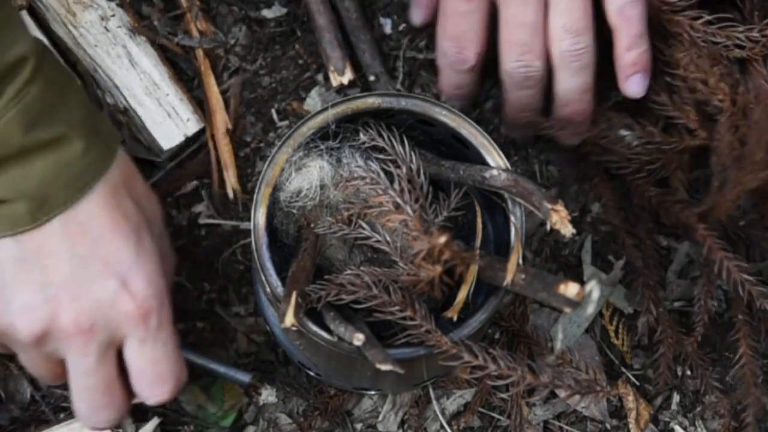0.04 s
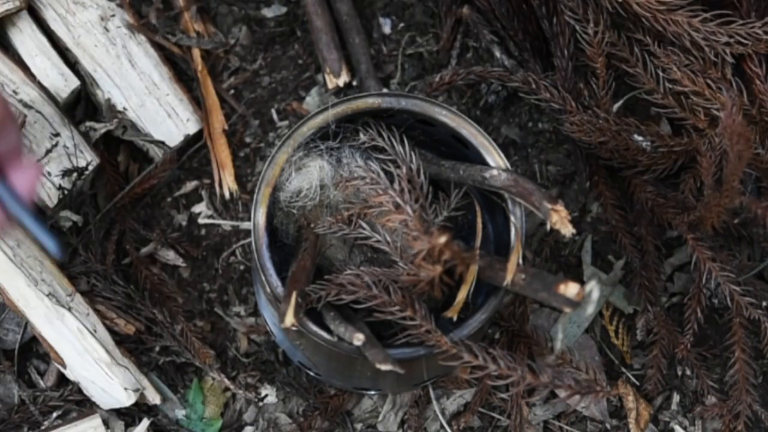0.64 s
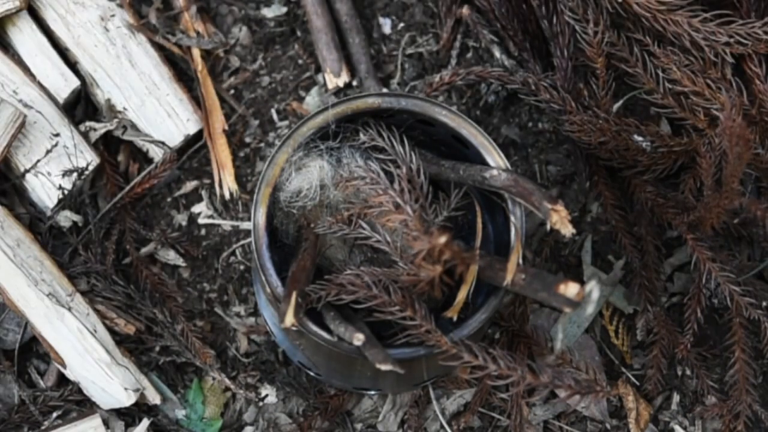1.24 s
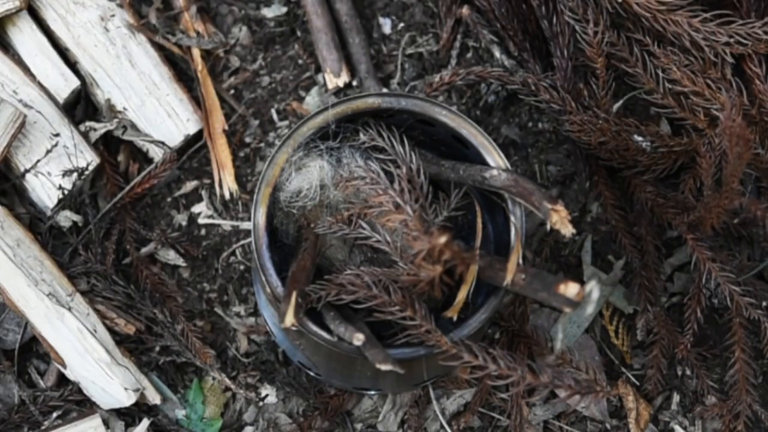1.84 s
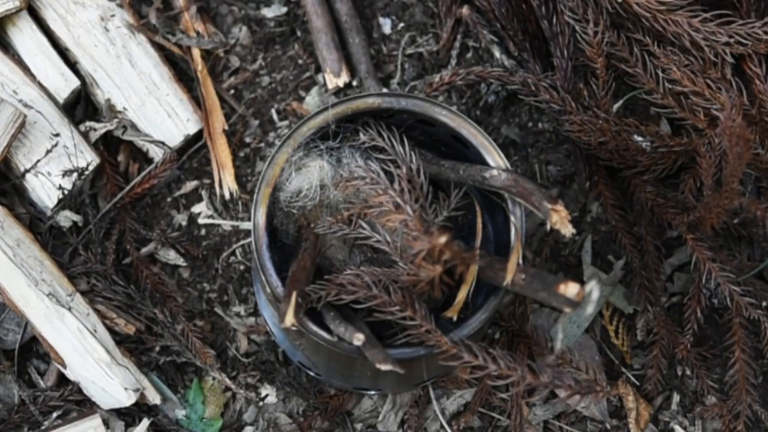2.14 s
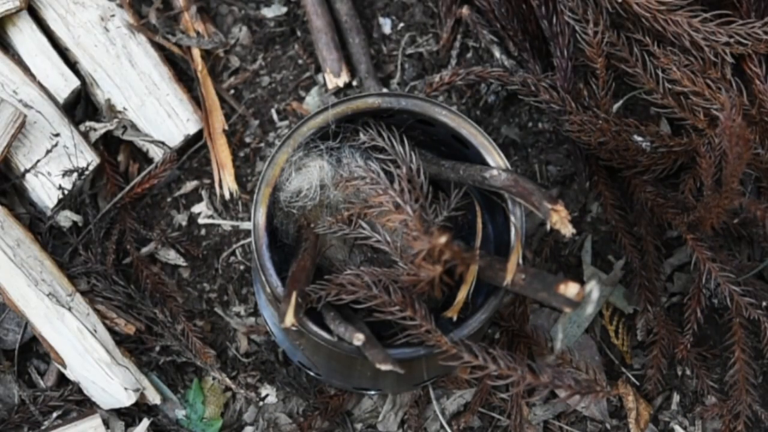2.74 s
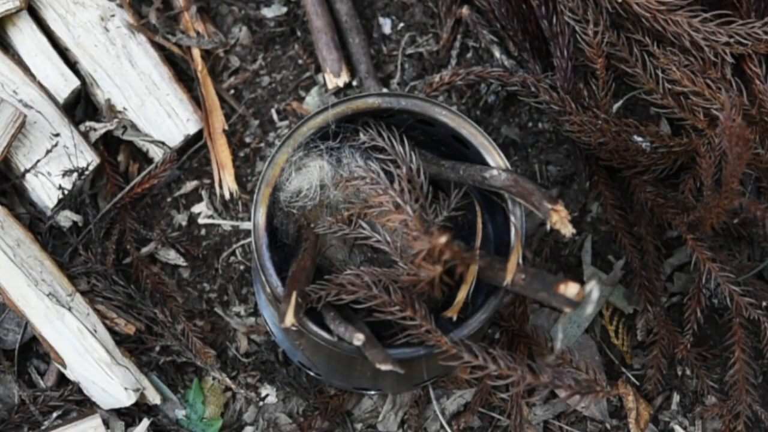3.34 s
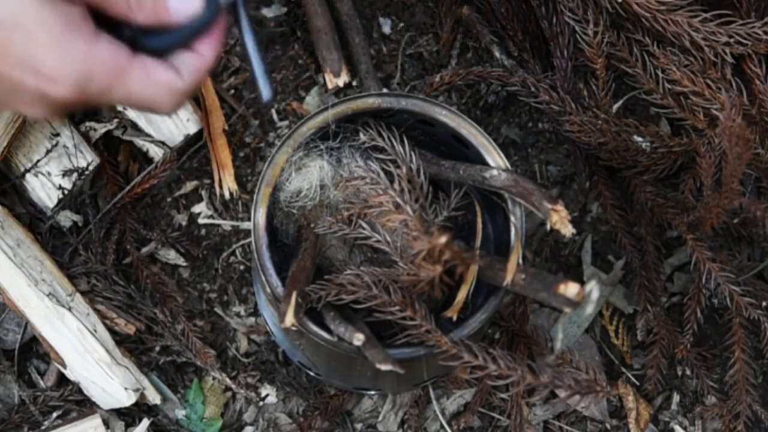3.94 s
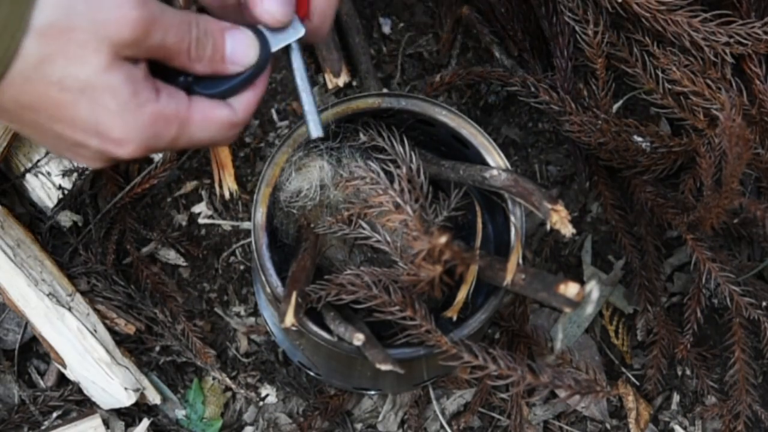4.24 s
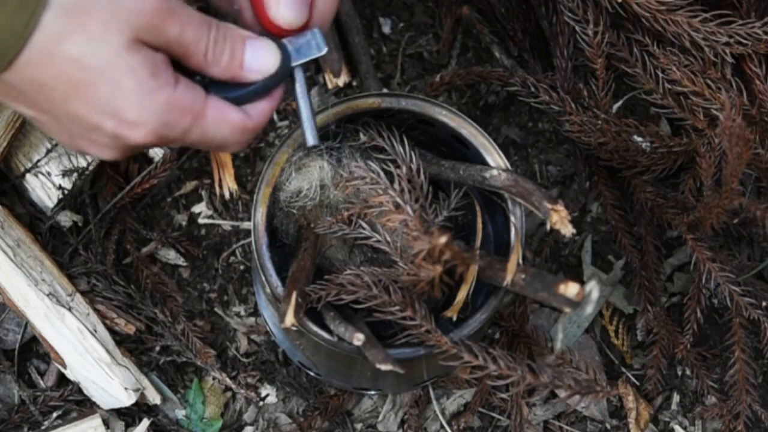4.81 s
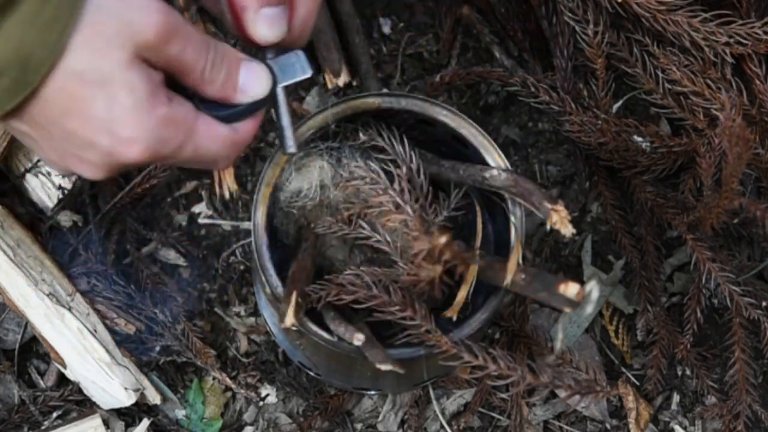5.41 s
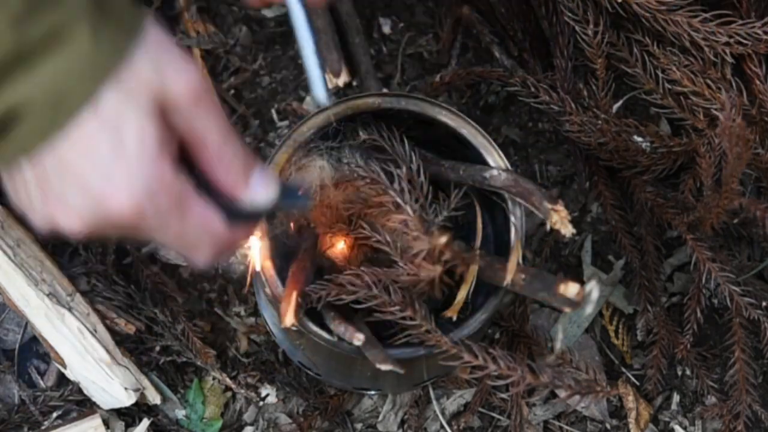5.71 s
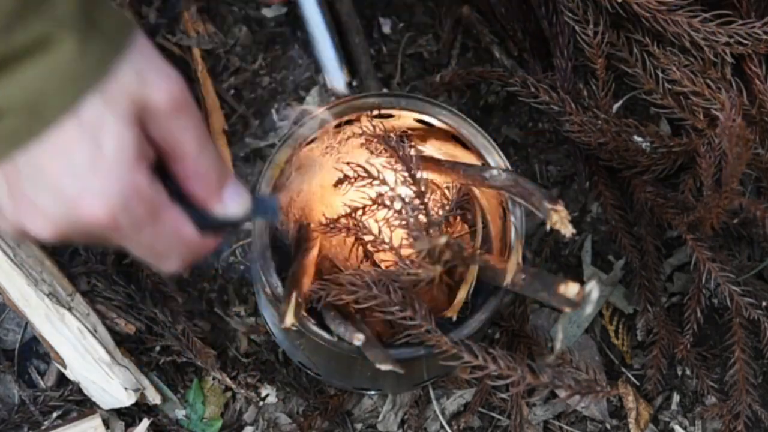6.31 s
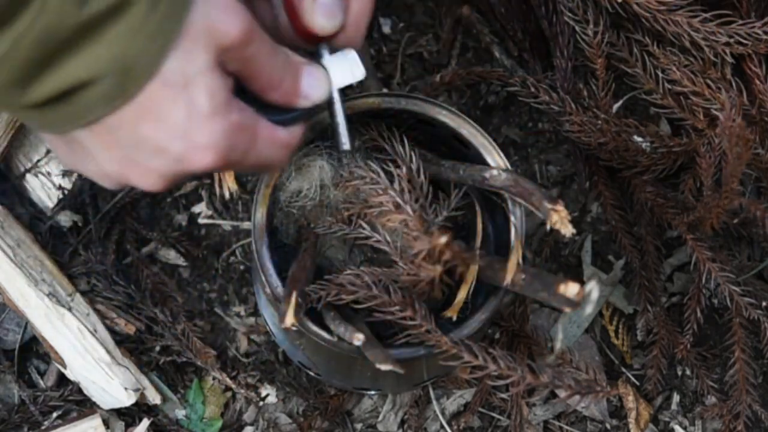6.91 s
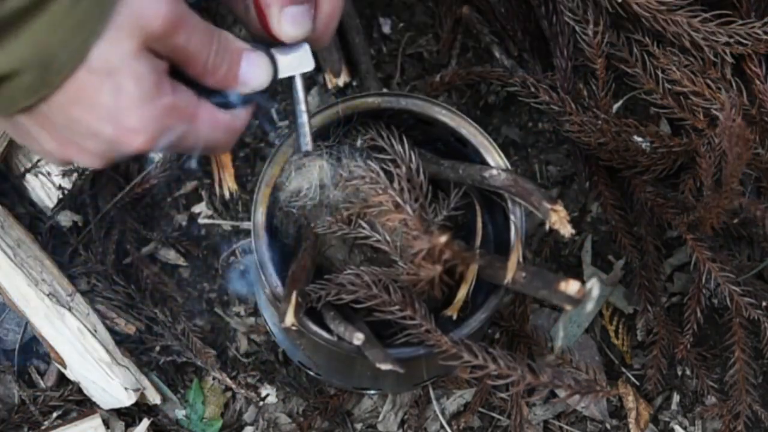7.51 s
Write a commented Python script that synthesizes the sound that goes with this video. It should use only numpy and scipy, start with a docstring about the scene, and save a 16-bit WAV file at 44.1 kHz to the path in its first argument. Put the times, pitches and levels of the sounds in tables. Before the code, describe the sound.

A sleeve rustles and distant hawks whistle, then a steel striker scrapes a ferro rod four times, ending in a thin metal clang.

```python
"""A jacket sleeve rustles, cloth rubbing on cloth, and sticks knock as tools are fetched in a forest.
Two hawks whistle far off in the trees; a faint mains hum lies under the quiet air.
Then a steel striker taps a ferro rod (a fire starter) and scrapes down it four times, shaving off
sparks that fizz over a small camp stove. After the last stroke the stove's thin steel clangs.
It is all heard through two microphone openings (ports) set close together."""
import sys
import numpy as np
from scipy import signal
from scipy.fft import rfft, irfft
from scipy.io import wavfile
from scipy.ndimage import map_coordinates

SR = 44100
rng = np.random.default_rng(int(sys.argv[2]) if len(sys.argv) > 2 else 0)


def waveform_to_disk(signal):
    """Save audio, clipped to [-1, 1], as 16-bit WAV at the path in sys.argv[1]."""
    frames = np.transpose(np.atleast_2d(signal))
    scaled = np.clip(frames, -1, 1) * 32767
    samples = np.round(scaled).astype(np.int16)
    wavfile.write(sys.argv[1], SR, samples)


N = 333396
TIME = np.arange(N) / SR


def amp(db):
    """Turns decibels into a number to multiply by."""
    return 10 ** (np.asarray(db) / 20)


def evened(x):
    """Scales a sound to an average strength (rms) of 1."""
    return x / np.sqrt(np.mean(x ** 2) + 1e-20)


def read(points, hz):
    """Reads between (frequency, value) points, with octaves evenly spaced."""
    f, value = np.transpose(points)
    return np.interp(np.log(hz + 1), np.log(f + 1), value)


def add(mix, start, sound):
    """Adds a sound to the mix at a start time in seconds."""
    part = mix[max(round(start * SR), 0):][:len(sound)]
    part += sound[:len(part)]


def bins(x):
    """Lists the frequencies in the spectrum of x."""
    return np.fft.rfftfreq(x.shape[-1], 1 / SR)


def colour(x, db):
    """Turns each frequency up or down by its own number of decibels."""
    return irfft(rfft(x) * amp(db), x.shape[-1])


def cut_bass(x, edge_hz):
    """Takes out the bass below an edge."""
    return signal.sosfilt(signal.butter(3, edge_hz, "high", fs=SR, output="sos"), x)


def wander(count, rate_hz):
    """A smooth random wobble, about 1 in size."""
    knots = np.arange(count) * rate_hz * 2 / SR
    return map_coordinates(rng.standard_normal(8192), [knots], order=3, mode="wrap")


def grains(count, per_s, spread_db):
    """A stream of tiny cracks, random in time and size."""
    size = amp(spread_db * np.minimum(rng.exponential(1, count), 4))
    return evened(size * rng.standard_normal(count) * (rng.random(count) < per_s / SR))


def ring(modes, t):
    """The fading tones of a struck thing; t60, the ring time, is how long one takes to drop 60 dB."""
    return sum(amp(db - 60 * t / t60) * np.sin(2 * np.pi * (hz * t + rng.random()))
               for hz, db, t60 in modes)


def ports(x, aside, direct_share):
    """The left port hears a sound from the side first; the ground scatters it differently to each."""
    # how far the left port is ahead: (frequency [Hz], phase lead [radians])
    port_lead = [(0, 0), (3450, .75), (6500, 1.55), (11000, 2.9), (14000, 3.6), (15500, 4.8), (17000, 5.2)]
    t = TIME[:512]
    paths = rng.standard_normal((2, len(t))) * np.exp(-t / 0.0048) * (t > .0004)
    paths /= np.linalg.norm(paths, axis=1, keepdims=True)
    scattered = signal.oaconvolve(x[None], paths, axes=1)[:, :N]
    lag = aside * np.interp(bins(x), *np.transpose(port_lead))
    right = irfft(rfft(x) * np.exp(-1j * lag), N)
    return np.sqrt(direct_share) * np.array([x, right]) + np.sqrt(1 - direct_share) * scattered


def forest_echo(x, t60, treble_t60):
    """Scattered echoes from trunks and ground; the treble fades at its own rate."""
    bounces = rng.standard_normal((2, SR)) * (rng.random((2, SR)) < 3000 / SR) * (TIME[:SR] > .006)
    hz, t, spectra = signal.stft(bounces, SR, nperseg=256)
    fade_s = read([(2000, t60), (12000, treble_t60)], hz)[:, None]
    tail = signal.istft(spectra * amp(-60 * t / fade_s), SR, nperseg=256)[1]
    return signal.fftconvolve(x[None], tail / np.linalg.norm(tail[0]), axes=1)[:, :N]


def air(air_db=-55.0, swell_db=-0.53):
    """Quiet forest air, most alike in both ports in the bass, over a steady mains hum."""
    # the air's tone: (frequency [Hz], level [dB])
    air_tone = [(20, -23), (60, -6), (150, -1.5), (300, -1), (850, 1.5), (1400, -0.5), (2200, -4.5),
                (5000, -3), (9000, -9), (16000, -12.5)]
    # how alike left and right are: (frequency [Hz], likeness [0-1])
    likeness = [(50, 0.62), (250, 0.32), (1200, 0.47), (3000, 0.33), (7000, 0.048), (15000, 0.024)]
    # the hum's tones: (frequency [Hz], level [dB])
    hum_tones = [(60, -72), (120, -73), (180, -87), (240, -81)]
    hz = bins(TIME)
    left, other = rfft(rng.standard_normal((2, N)))
    same = read(likeness, hz)
    right = same * left + np.sqrt(1 - same ** 2) * other
    hiss = evened(irfft(np.array([left, right]) * amp(read(air_tone, hz)), N))
    hum = sum(np.sqrt(2) * amp(db) * np.sin(2 * np.pi * (f * TIME + rng.random()))
              for f, db in hum_tones)
    return amp(air_db + swell_db * wander(N, rate_hz=1.76)) * hiss + hum


def hawks(start_db=-9, push_db=4, third_db=-17, flutter_db=2.0, waver=0.0063, hoarse_waver=.014):
    """Each whistle slides up hoarsely, holds and drops more clearly; the throat boosts one pitch band."""
    # calls; the pitches are the main tone's, and the low tone lies an octave below it:
    # (time [s], length [s], rise [s], fall [s], pitch after rise [Hz], pitch before fall [Hz],
    # end pitch [Hz], level [dB], change while held [dB], low tone level [dB], hoarseness [0-1])
    whistles = [(0.691, 0.59, 0.15, 0.054, 4022, 4089, 3280, -52.5, -11, -59.5, 0.24),
                (1.596, 0.38, 0.17, 0.11, 4740, 4740, 4340, -56.5, -3, -75, 0.31),
                (1.851, .43, 0.2, .145, 4527, 4570, 2730, -53.5, 1, -55, 0.48),
                (2.276, 0.29, 0.21, .06, 4905, 4830, 2860, -48, -5, -68, 0.77),
                (2.56, 0.062, 0.0032, .025, 3024, 2980, 2360, -52.5, -6, -82, .15),
                (3.691, 1.105, .27, .045, 4770, 4472, 3490, -55.5, -5, -69, 0.28),
                (4.191, 0.62, .19, .04, 4573, 3713, 3350, -52.5, -19.5, -60.5, .7),
                (6.091, 1, .36, .2, 4700, 4826, 3840, -56.5, -2, -71, 0.33),
                (7.121, 0.49, 0.055, 0.056, 3916, 4546, 3600, -60, 1.5, -58.5, 0.5)]
    throat_hz, throat_width_hz, boost_db = 3973, 860, 9.5
    out = np.zeros(N)
    for start, length, rise, fall, top_hz, held_hz, end_hz, db, change_db, low_db, hoarse in whistles:
        t = np.arange(0, length, 1 / SR)
        rising = np.maximum(1 - t / rise, 0)
        falling = np.maximum(1 - (length - t) / fall, 0)
        held = np.clip((t - rise) / max(length - rise - fall, .01), 0, 1)
        hz = top_hz * (1 - .27 * rising ** 2.2)  # starts 27% low
        hz += (held_hz - top_hz) * held + (end_hz - held_hz) * falling ** 1.2
        throat_db = boost_db / (1 + (2 * (hz - throat_hz) / throat_width_hz) ** 2)
        effort_db = db + start_db * rising + change_db * held + push_db * np.sin(np.pi * falling)
        rough = hoarse * (1 - 0.75 * held)
        wobble = (waver + hoarse_waver * rough) * wander(len(t), rate_hz=110)
        phase = np.pi * np.cumsum(hz * (1 + wobble)) / SR
        # the low tone is strongest while the pitch is held
        voice = amp(low_db - 12 * (rising + falling)) * np.exp(1j * phase)
        voice += amp(effort_db + throat_db) * np.exp(2j * phase)
        voice += amp(effort_db + third_db) * np.exp(3j * phase)
        # the membranes swing unevenly: a rasp round each tone
        rasp = rough * (wander(len(t), rate_hz=420) + 1j * wander(len(t), rate_hz=420))
        voice = (voice * (1 + rasp)).imag / np.hypot(1, rough)
        flutter = amp(flutter_db * wander(len(t), rate_hz=55))
        add(out, start, voice * flutter * signal.windows.tukey(len(t), .04))
    return out


def arm():
    """Each arm move speeds up, holds and slows; gives the strength of the swish and of the folds."""
    # moves in the sleeve: (time [s], length [s], rise [s], fall [s], swish [dB], folds [dB])
    moves = [(0, 0.39, 0.091, 0.19, -48.5, -71), (0.357, 0.15, 0.036, .06, -52.5, -71),
             (0.376, 0.93, 0.45, 0.3, -50, -54), (1.053, 0.91, 0.15, 0.39, -54.5, -57.5),
             (1.795, 0.98, 0.079, 0.46, -57, -65.5), (3.372, 0.86, 0.089, 0.2, -53.5, -57.5),
             (4.15, .75, 0.1, 0.21, -61.5, -78)]
    power = np.zeros((2, N))
    for start, length, rise, fall, swish_db, folds_db in moves:
        speed = np.clip(np.minimum((TIME - start) / rise, (start + length - TIME) / fall), 0, 1)
        power += (amp([[swish_db], [folds_db]]) * speed) ** 2
    return np.sqrt(power)


def sleeve(flicker_db=1.17, spread=0.21, snag=0.12):
    """Cloth slides on cloth: a fine swish of threads over the soft, lower sound of the folds."""
    # the tone of the swish and of the folds, each: (frequency [Hz], level [dB])
    swish_tone = [(900, -21), (2000, -7), (3500, -1), (6000, -2), (8200, -2.5), (11000, -9.5), (16000, -46)]
    folds_tone = [(120, -22), (300, -7.5), (550, -4), (800, 0), (1300, -0.5), (2000, -9), (4000, -19.5)]
    swish, folds = arm()
    # three layers (shared, left, right); a few threads snag and let go with a tick
    threads = np.array([grains(N, per_s=12000, spread_db=0.5)
                        + snag * grains(N, per_s=60, spread_db=-8.5) for _ in range(3)])
    cloth = swish * evened(colour(threads, read(swish_tone, bins(TIME))))
    cloth += folds * evened(colour(threads, read(folds_tone, bins(TIME))))
    cloth *= amp(flicker_db * wander(N, rate_hz=23)) / np.hypot(1, spread)
    return ports(cloth[0], aside=0.92, direct_share=0.96) + spread * cloth[1:]


def sticks(t60=0.013, snap=0.41, snap_hz=1500):
    """Dry wood knocks on the ground: a brief snap and a few clashing tones."""
    # knocks: (time [s], level [dB], pitch [Hz])
    knocks = [(.978, -29, 564), (1.2415, -29.5, 750), (1.392, -39.5, 1100), (1.417, -40, 694),
              (1.617, -40, 1450), (1.705, -37, 1400), (1.875, -43, 980), (2.055, -36, 354),
              (2.056, -51, 1740), (2.584, -40.5, 646)]
    out, t = np.zeros(N), TIME[:4096]
    dull_db = -10 * np.log10(1 + (bins(t) / snap_hz) ** 4)
    for start, db, hz in knocks:
        modes = [(hz, 0, t60), (hz * 1.31, -3, t60 / 2), (hz * .72, -6, t60), (hz * 2.4, -4, t60 / 2)]
        body = ring(modes, t)
        crack = evened(colour(rng.standard_normal(len(t)), dull_db)) * np.exp(-t / 0.0014)
        knock = (body + snap * crack) * (1 - np.exp(-t / 0.0003))
        add(out, start, amp(db) * knock / abs(knock).max())
    return out


def stove(ring_db=1.0, clatter_db=-2.0, clatter_t60=0.18):
    """Thin steel is knocked: the first blow sets the shell ringing and each bounce adds clatter."""
    # the blow and its bounces: (time [s], level [dB])
    clangs = [(7.204, -16.5), (7.206, -14.5), (7.2095, -33), (7.2174, -27)]
    # the shell's tones: (frequency [Hz], level [dB], ring time [s])
    shell_modes = [(528, -34, .36), (921, -30, .18), (1275, -22, .15), (1766, -1, .085), (1835, -2, .115),
                   (1812, -25, .9), (2024, -13, .1), (2464, -6, .11), (2606, -24, .35), (2756, -28, .5),
                   (3836, -14, .1), (4130, -13, .12), (4412, -9, .1), (4635, -19, .22), (4893, -17, .2),
                   (5220, -12, .14), (5632, -12, .16), (5928, -9, .19), (6123, -14, .12), (6301, -14, .13),
                   (6934, -13, .11), (7587, -7, .11), (8236, -18, .17), (8433, -9, .11), (8899, -17, .14),
                   (9991, -21, .1)]
    # its crowded, quickly fading upper tones: (frequency [Hz], level [dB])
    clatter_tone = [(80, -65), (300, -44), (600, -41), (1300, -18), (1900, -1), (3200, -0.5), (4400, 1),
                    (8600, 6.5), (10500, 0), (13000, -16), (15500, -8)]
    out, t = np.zeros(N), TIME[:32768]
    blow_s, blow_db = clangs[0]
    add(out, blow_s, amp(blow_db + ring_db) * ring(shell_modes, t) * (1 - np.exp(-t / 0.00041)))
    fade = np.exp(-t / 0.0041) + 0.36 * amp(-60 * t / clatter_t60)
    for start, db in clangs:
        clatter = evened(colour(rng.standard_normal(len(t)), read(clatter_tone, bins(t))))
        add(out, start, clatter * amp(db + clatter_db) * fade)
    return out


def scrape_colour(x, tilt_db):
    """Gives tiny cracks the tone of rod and striker, brightened by tilt_db for each octave."""
    # the scrape's overall tone: (frequency [Hz], level [dB])
    scrape_tone = [(50, -50), (150, -18), (430, -11), (750, -11.5), (1050, -4), (2100, -7.5), (3200, -3),
                   (4800, -2.5), (6500, -1.5), (8000, -2), (9700, 0), (11300, -5), (13500, -8), (15700, -7)]
    # where the metal rings: (frequency [Hz], width [Hz], boost [dB])
    resonances = [(1275, 180, 5.7), (1770, 96, 3.4), (3210, 350, 3.8), (4400, 170, 4.8), (5670, 65, 4.1),
                  (6170, 83, 9.5), (6900, 230, 8.9), (8560, 79, 4.5), (9220, 420, 7.2), (8940, 150, 8.3),
                  (10880, 170, 8.6), (12100, 230, 2.4)]
    hz = bins(x)
    peaks = sum(db / (1 + (2 * (hz - f) / width) ** 2) for f, width, db in resonances)
    return colour(x, read(scrape_tone, hz) + peaks + tilt_db * np.log2((hz + 100) / 6000))


def contacts(tick_db=12.0, focus_db=6.0, slide_ring=0.51):
    """Steel meets rod: short clicks, and gritty slides that ring the same tones."""
    # striker and rod touch: (time [s], level [dB], centre of the click's tone [Hz])
    taps = [(0.313, -33, 6140), (.680, -28, 8000), (2.124, -31, 4330), (4.8536, -31, 7000),
            (4.8663, -28.5, 2560), (5.4905, -12, 3200), (6.1404, -10.5, 9000), (6.427, -24, 8800),
            (6.44, -37, 5000), (6.753, -15.5, 8500), (6.7578, -29, 6000), (6.8164, -27.5, 2430),
            (7.5415, -22, 7900)]
    # the edge slides lightly on the rod: (time [s], length [s], level [dB])
    slides = [(4.85, 0.013, -43), (5.033, 0.043, -43), (5.487, 0.021, -44), (5.671, 0.024, -46),
              (6.253, 0.028, -41.5), (6.751, 0.084, -51), (6.976, 0.06, -46)]
    # rod and striker, muffled by the fingers: (frequency [Hz], level [dB], ring time [s])
    steel_modes = [(1250, 1, 0.015), (3300, 6, 0.019), (3860, 11.5, 0.0046), (4600, -5.5, 0.018),
                   (6400, -27, 0.004), (7065, 10.5, 0.0084), (9160, 13, 0.0037), (13500, 1, 0.004)]
    out, t = np.zeros(N), TIME[:2048]
    lead_samples = 64
    for start, db, hz in taps:
        click = ring(steel_modes, t) + amp(tick_db) * rng.standard_normal(len(t)) * np.exp(-t / .001)
        click = np.pad(click, (lead_samples, 0))
        octaves_away = abs(np.log2((bins(click) + 300) / hz))
        click = colour(click, -focus_db * octaves_away)[:1500]
        add(out, start - lead_samples / SR, amp(db) * click / abs(click).max())
    for start, length, db in slides:
        grit = grains(8192, per_s=5000, spread_db=3)
        ringing = evened(signal.fftconvolve(grit, ring(steel_modes, t))[:len(grit)])
        slide = evened(slide_ring * ringing + evened(scrape_colour(grit, tilt_db=-1.0)))
        count = round(length * SR)
        add(out, start, amp(db) * slide[:count] * signal.windows.tukey(count, .35))
    return out


def scrapes(release_db_per_s=1300, chatter_db=2.0, sparks_db=-21, sparks_t60=0.36, flake_db=2.5):
    """The edge shaves the rod ever harder, then flies off its end; the shavings fizz as they burn."""
    # strokes: (edge bites [s], full pressure [s], edge leaves [s], level at the bite [dB],
    # full level [dB], brightness [dB per octave])
    strokes = [(5.077, 5.121, 5.130, -42, -26.5, .5), (5.6925, 5.718, 5.729, -34, -23.5, 0),
               (6.277, 6.298, 6.325, -41, -24.5, 0), (7.016, 7.033, 7.061, -41, -23.5, 0)]
    # flakes snap off the rod: (time [s], level [dB])
    flakes = [(5.1125, -13), (5.1149, -9), (5.151, -32), (5.718, -14.5), (5.7291, -12.5), (5.7426, -34),
              (6.294, -15), (6.3580, -29), (7.0343, -10.5), (7.037, -11.5), (7.0407, -12)]
    out, t = np.zeros(N), TIME[:16384]
    for bite, full, leave, bite_db, full_db, tilt_db in strokes:
        pressure = np.minimum(t / (full - bite), 1) ** 0.71
        since_leaving = np.maximum(bite + t - leave, 0)
        level_db = bite_db + (full_db - bite_db) * pressure - release_db_per_s * since_leaving
        shaving = evened(scrape_colour(grains(len(t), per_s=28000, spread_db=-0.5), tilt_db))
        add(out, bite, shaving * amp(level_db + chatter_db * wander(len(t), rate_hz=237)))
        sparks = evened(scrape_colour(grains(len(t), per_s=4400, spread_db=3.5), tilt_db=-3.5))
        add(out, leave, sparks * amp(full_db + sparks_db - 60 * t / sparks_t60))
    since_snap = t[:512] - .001
    for start, db in flakes:
        burst = rng.standard_normal(len(since_snap)) * (since_snap > 0) * np.exp(-since_snap / .0007)
        snap = scrape_colour(burst, tilt_db=0)
        add(out, start + since_snap[0], amp(db + flake_db) * snap / abs(snap).max())
    return out


def scene(tool_echo_db=-20.0, hawk_echo_db=3.0, left_db=0.5):
    """Tools and cloth close by, hawks far off among the trees."""
    # small things give off hardly any bass, sharp blows on thin steel least of all
    tools = cut_bass(scrapes(), 166) + cut_bass(contacts() + stove(), 420) + cut_bass(sticks(), 350)
    calls = hawks()
    close = ports(tools, aside=.88, direct_share=0.96) * amp([[-.4], [.4]])
    close += amp(tool_echo_db) * forest_echo(tools, t60=0.34, treble_t60=0.079)
    far = ports(calls, aside=0.68, direct_share=1.0)
    far += amp(hawk_echo_db) * forest_echo(calls, t60=0.64, treble_t60=0.79)
    return close + (sleeve() + far) * amp([[left_db], [-left_db]]) + air()


def record(dry):
    """Cuts off the very highest treble."""
    edge_hz = 16080
    low_pass = signal.firwin(511, edge_hz, window=("kaiser", 9), fs=SR)
    return signal.oaconvolve(dry, low_pass[None], "same")


dry = scene()
out = record(dry)
waveform_to_disk(out)
```